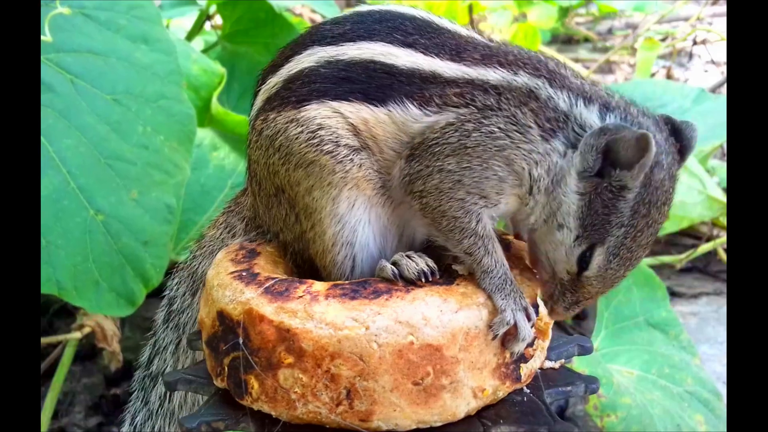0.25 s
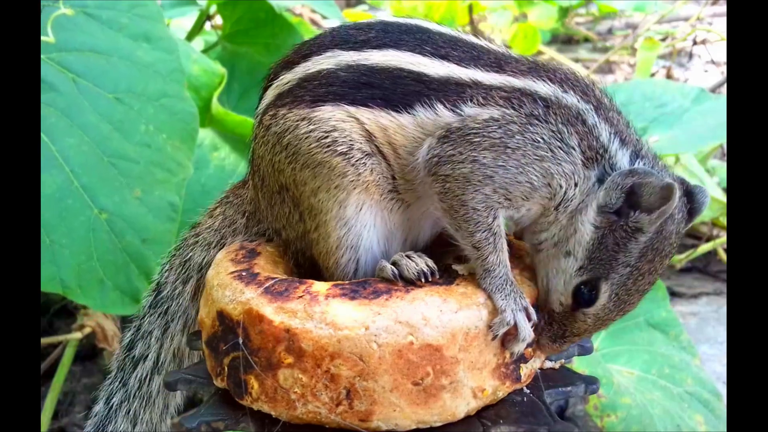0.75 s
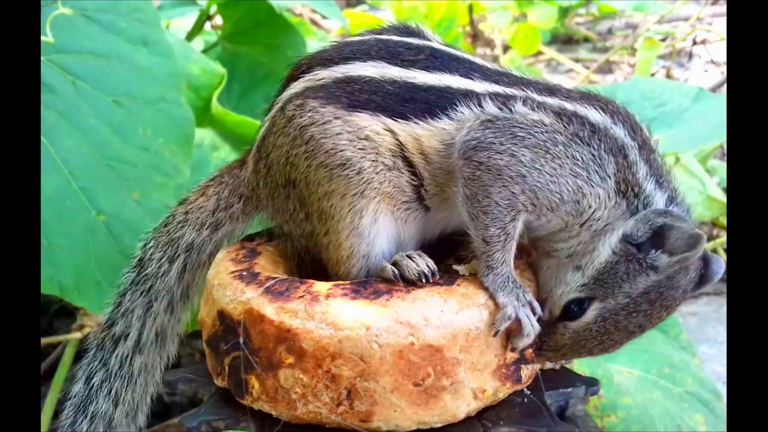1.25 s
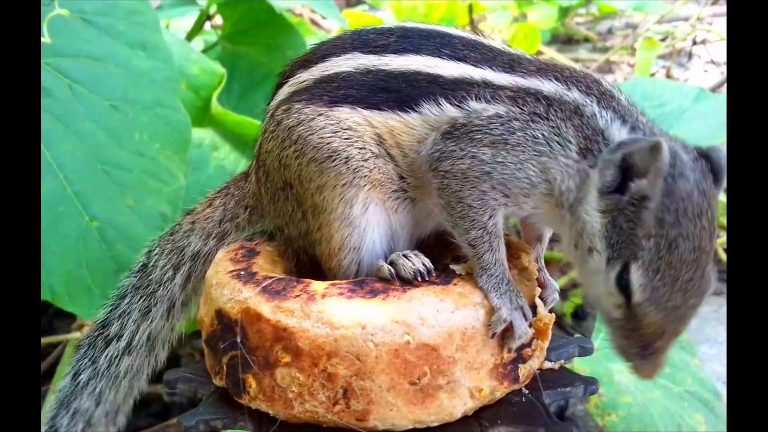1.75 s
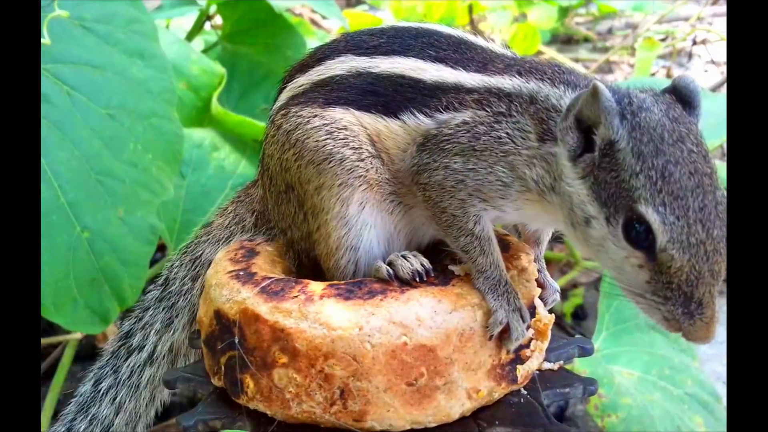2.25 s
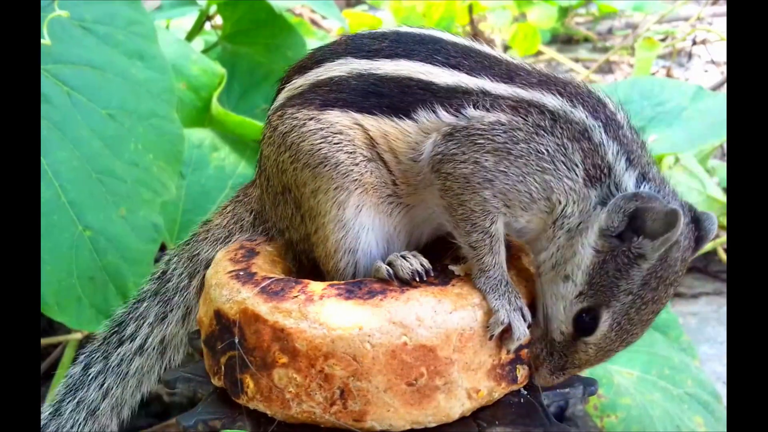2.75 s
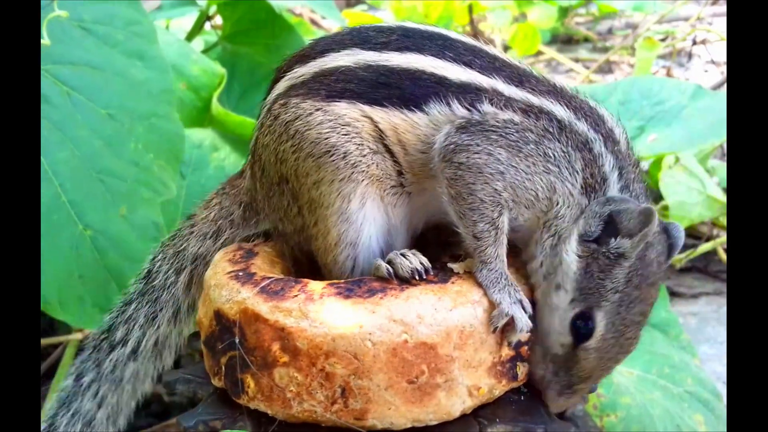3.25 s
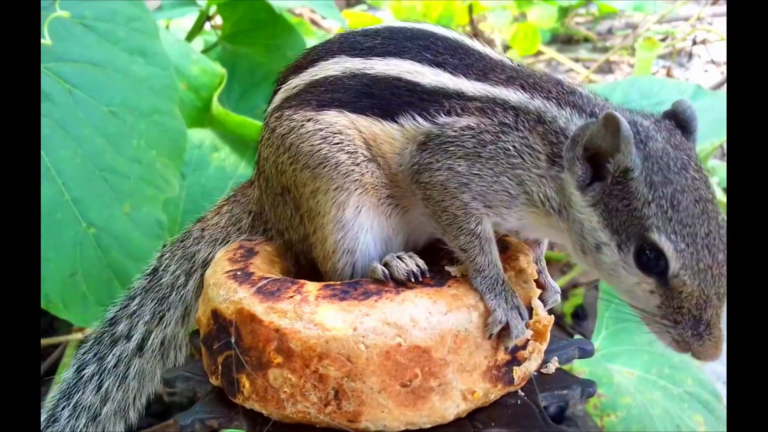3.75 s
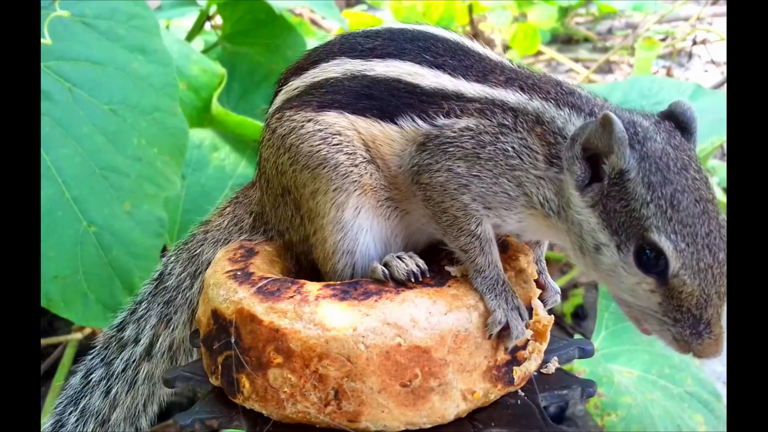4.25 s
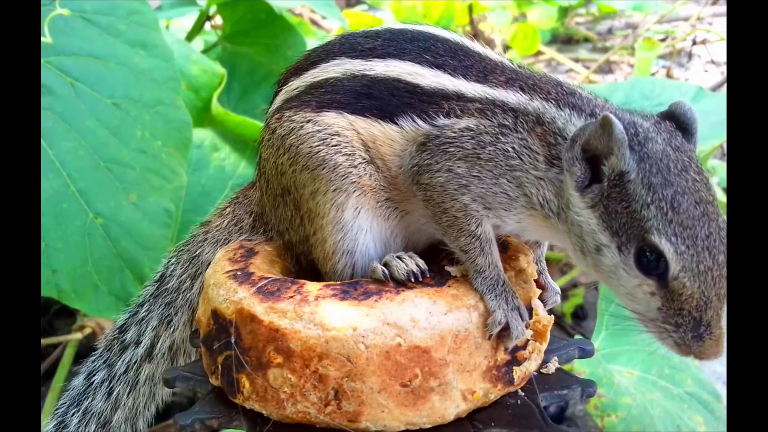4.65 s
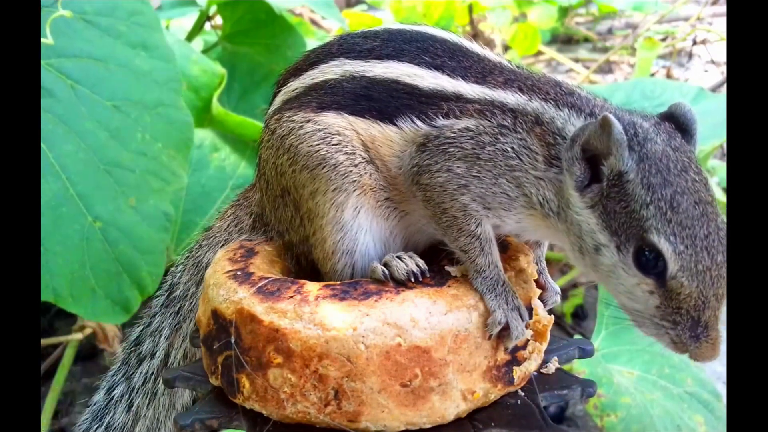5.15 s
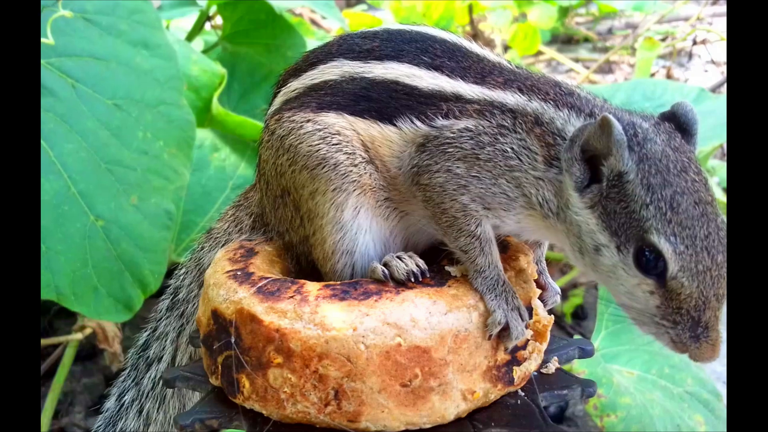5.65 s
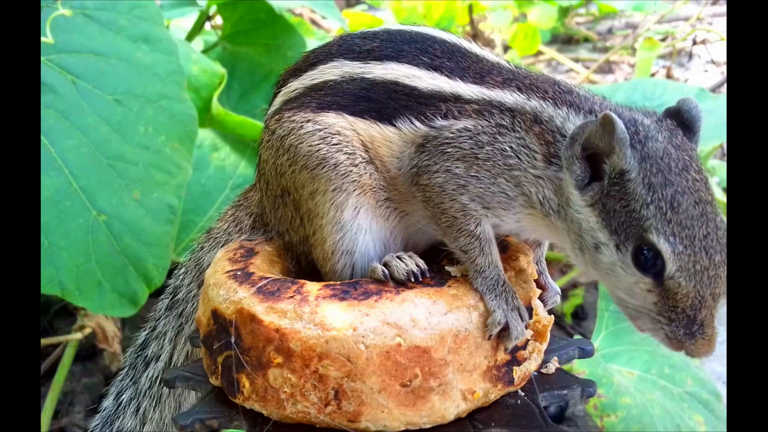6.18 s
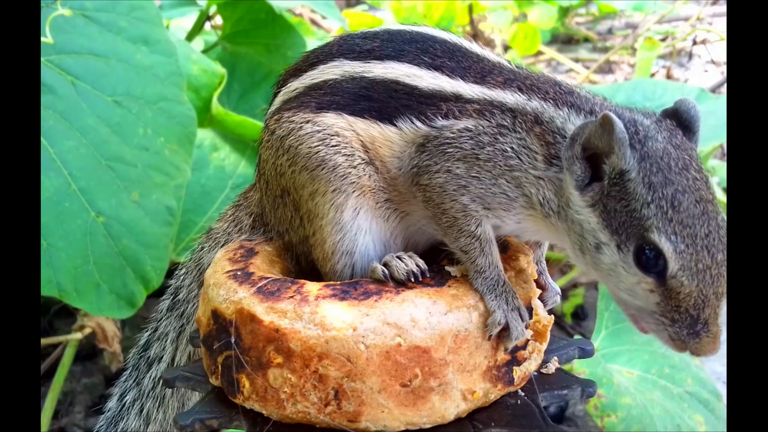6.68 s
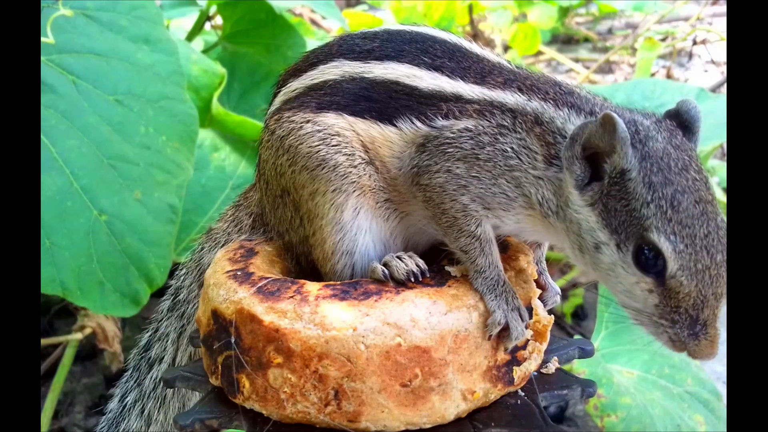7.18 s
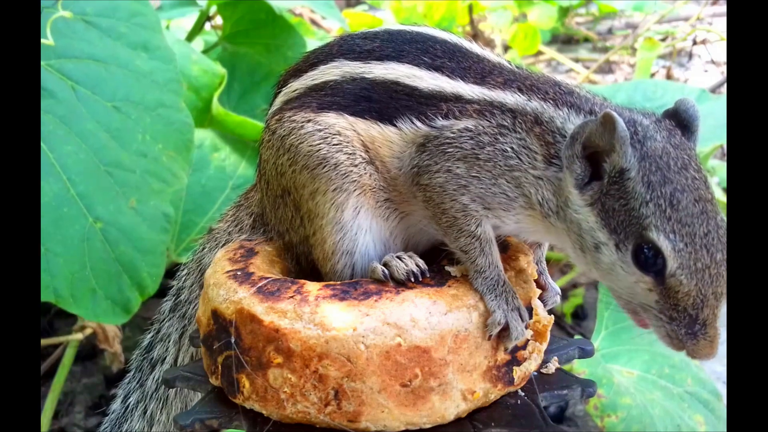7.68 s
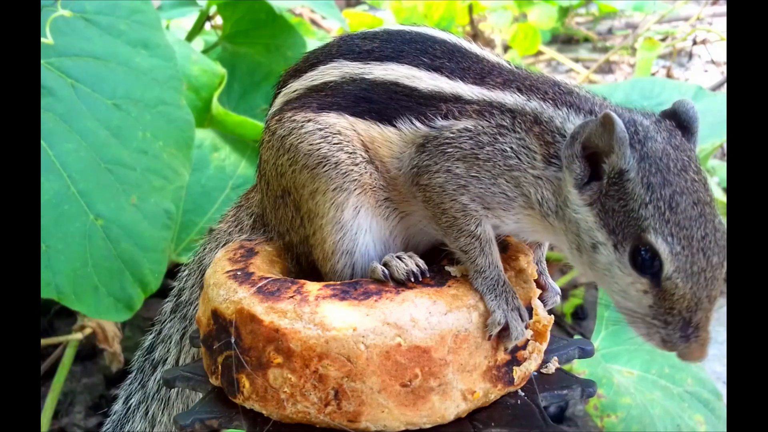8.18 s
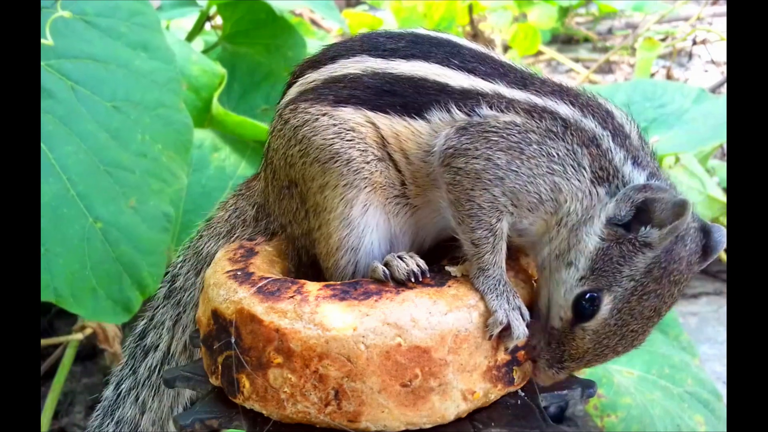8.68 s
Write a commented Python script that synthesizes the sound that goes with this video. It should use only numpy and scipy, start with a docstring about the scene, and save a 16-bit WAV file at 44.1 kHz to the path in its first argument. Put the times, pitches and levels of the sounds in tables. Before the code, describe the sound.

A small striped squirrel calls very close to the microphone in a quiet garden. A thin, high twitter drops within moments into a steady, rapid beat of short falling chips. Spaced piercing shrieks follow, breaking downward in pitch, then arched squeals that sink and turn hoarse. Wheezy, whistling squeaks join and alternate with soft nasal buzzes, pausing briefly before a last quick run. Faint outdoor wash lies beneath, with only a short echo.

```python
"""Squirrel alarm calls in a quiet garden

A small squirrel calls close by: short falling chips drop from a thin twitter to a steady beat.
The trill breaks into shrieks and arched squeals, which sink and grow hoarse.
Wheezy squeaks then alternate with soft nasal buzzes, over a faint wash of outdoor noise.
Each call sums harmonics of the vocal folds with noise puffed once a cycle, both shaped by a throat spectrum."""
import sys
import numpy as np
from scipy import signal
from scipy.fft import rfft, irfft, next_fast_len
from scipy.io import wavfile
from scipy.ndimage import uniform_filter1d

SR = 44100
rng = np.random.default_rng(int(sys.argv[2]) if len(sys.argv) > 2 else 0)


def generate_wav(sig):
    """Save sig (samples, or channels by samples) to the path in sys.argv[1] as 16-bit PCM at SR."""
    pcm = np.round(np.clip(np.atleast_2d(sig).T, -1, 1) * 32767).astype(np.int16)
    wavfile.write(sys.argv[1], SR, pcm)


N = 393460
EDGE_HZ = 11400  # upper band limit


def gain_of(db):
    """Logarithmic level: decibels become an amplitude factor."""
    return 10 ** (np.asarray(db) / 20)


def evened(x):
    """Normalization: scales to an rms of one."""
    return x / np.sqrt(np.mean(x ** 2) + 1e-20)


def read(points, hz):
    """Log-frequency interpolation of a two-column curve."""
    f, value = np.transpose(points)
    return np.interp(np.log(hz + 1), np.log(f + 1), value)


def along(curve, x):
    """Linear interpolation: reads every column of a curve at x."""
    at, *columns = np.transpose(curve)
    return [np.interp(x, at, column) for column in columns]


def coloured(x, points):
    """Linear filtering: multiplies the spectrum of x by a curve in dB."""
    size = next_fast_len(len(x) + 512)
    gain = gain_of(read(points, np.fft.rfftfreq(size, 1 / SR)))
    return irfft(rfft(x, size) * gain, size)[:len(x)]


def wander(size, rate_hz):
    """Random modulation of rms about one: chance values, two to a cycle of rate_hz, joined by lines."""
    knots = np.sqrt(1.5) * rng.standard_normal(512)
    return np.interp(2 * rate_hz * np.arange(size) / SR, np.arange(len(knots)), knots)


def span(start, end):
    """Normalized time: runs from 0 to 1 over the samples of a call."""
    return np.linspace(0, 1, max(round((end - start) * SR), 64))


def parts(u, values):
    """Piecewise interpolation: joins values at the centres of equal parts of a call."""
    return np.interp(u, (np.arange(len(values)) + .5) / len(values), values)


def fade(size, rise_s, fall_s):
    """Amplitude envelope: quarter-sine onset and release."""
    t = np.arange(size) / SR
    rise = np.sin(np.pi / 2 * np.minimum(t / rise_s, 1))
    fall = np.sin(np.pi / 2 * np.minimum(t[::-1] / fall_s, 1))
    return rise * fall


def played(call, rows):
    """Superposition: adds one call for each row at its start time."""
    out = np.zeros(N)
    for row in rows:
        sound = call(*row)
        part = out[round(row[0] * SR):]
        part[:len(sound)] += sound[:len(part)]
    return out


# spectrum of the outdoor noise: frequency_hz, relative_level_db
AIR_SPECTRUM = [(25, -3), (60, -4), (120, -5), (200, -1), (450, -7), (800, -8), (1600, -17), (2300, -27),
                (3200, -27), (4300, -21), (6000, -36), (11000, -46)]
# course of its level, before the swell: time_s, level_db
AIR_LEVEL = [(.37, -59), (1.8, -67), (2.5, -73.5), (3.3, -68), (4.3, -66.5), (5.3, -63), (6.4, -65.5),
             (7.3, -71), (8.9, -68)]
# left-right coherence: frequency_hz, likeness (0-1)
AIR_COHERENCE = [(40, .1), (400, 0.73), (9000, 0.96)]
AIR_START_S = .358


def air():
    """Filtered, partly coherent noise: a low, slowly swelling wash of distant outdoor sound."""
    t, hz = np.arange(N) / SR, np.fft.rfftfreq(N, 1 / SR)
    left, other = rfft(rng.standard_normal((2, N)))
    same = np.clip(read(AIR_COHERENCE, hz), -1, 1)
    pair = np.array([left, same * left + np.sqrt(1 - same ** 2) * other])
    wash = evened(irfft(pair * gain_of(read(AIR_SPECTRUM, hz)), N))
    # sines from 1 to 12 Hz, the slower ones stronger
    swell = evened(sum(np.sin(2 * np.pi * (f * t + rng.random())) / np.sqrt(f)
                       for f in np.geomspace(1, 12, 20)))
    level_db = np.interp(t, *np.transpose(AIR_LEVEL)) + 1.2 * swell
    return wash * gain_of(level_db) * (t > AIR_START_S)


# decay of the surroundings: frequency_hz, t60_s
ECHO_DECAY = [(200, 0.51), (900, 0.13), (2000, 0.14), (4300, 0.12), (8000, 0.047)]


def echo(x):
    """Diffuse reverberation: a short noise tail, partly alike in both ears, each band with its own decay."""
    hz, t, z = signal.stft(rng.standard_normal((2, SR // 2)), SR, nperseg=256)
    decay = gain_of(-60 * t / read(ECHO_DECAY, hz)[:, None])
    tails = signal.istft(z * decay, SR, nperseg=256)[1]
    mid, side = signal.fftconvolve(x[None], tails / np.linalg.norm(tails[0]), axes=1)[:, :N]
    return np.array([mid + 0.97 * side, mid - 0.15 * side])


# colour of close reflections: frequency_hz, gain_db
REFLECTION_COLOUR = [(900, -6), (3500, -8.5), (9000, 4.5)]


def scatter(x, t60):
    """Early reflection: objects close by return a short burst after 3 ms, different in each channel."""
    t = np.arange(SR // 8) / SR
    taps = rng.standard_normal((2, len(t))) * gain_of(-60 * t / t60) * (t > .003)
    taps = np.array([coloured(ear, REFLECTION_COLOUR) for ear in taps])
    return signal.oaconvolve(x[None], taps / np.linalg.norm(taps[0]), axes=1)[:, :N]


def voice(hz, throat, rough, first_order, uneven_db, rolloff_db):
    """Source and filter: fold harmonics and air puffs, one a cycle, pass the throat; also the bare fundamental."""
    phase = 2 * np.pi * np.cumsum(hz) / SR
    last_order = max(int(EDGE_HZ / hz.min()), first_order)
    k = np.arange(first_order, last_order + 1)[:, None]
    lag = rng.uniform(0, 2 * np.pi, k.shape)
    # each harmonic swells by itself, and high orders are weaker
    swell_db = uneven_db * np.array([wander(len(hz), rate_hz=41.5) for _ in k]) - rolloff_db * k
    strength = gain_of(read(throat, k * hz) + swell_db) * (k * hz < SR / 2)
    folds = (strength * np.cos(k * phase + lag)).sum(0)
    # the puffs are noise with the same roll-off
    tilted = [(f, db - rolloff_db * f / hz.mean()) for f, db in throat]
    puffs = coloured((1 + .7 * np.cos(phase)) * rng.standard_normal(len(hz)), tilted)
    rough = np.clip(rough, 0, 1)
    return np.sin(phase), evened((1 - rough) * evened(folds) + rough * evened(puffs))


def open_voice(hz, throat, rough, overtones_db):
    """Open-mouth radiation: a strong fundamental under overtones that grow with the strain."""
    fundamental, overtones = voice(hz, throat, rough, first_order=2, uneven_db=5.0, rolloff_db=2.45)
    share = gain_of(overtones_db)
    return (np.sqrt(2) * fundamental + share * overtones) / np.sqrt(1 + share ** 2)


# throat spectrum of a buzz: frequency_hz, gain_db
BUZZ_THROAT = [(300, -27), (600, -12.5), (1200, -17.5), (1700, -14.5), (2100, -26.5), (2900, -35.5),
               (3300, -6.5), (3700, 2.5), (4500, -9.5), (5600, -6.5), (7300, -29), (8600, -17.5),
               (9800, -20.5), (10800, -50.5)]
# higher buzzes are louder up to about 850 Hz; the highest are a little weaker: pitch_hz, level_db
BUZZ_LEVEL = [(450, -58), (500, -50), (600, -46.5), (850, -41.5), (1030, -44.5)]
# soft nasal buzzes: start_s, end_s, mean_pitch_hz
BUZZES = [(4.544, 4.598, 1049), (4.693, 4.718, 874), (4.722, 4.781, 803), (4.855, 4.922, 659),
          (4.914, 4.958, 918), (5.059, 5.11, 738), (5.399, 5.464, 747), (5.58, 5.634, 759),
          (5.763, 5.865, 952), (5.866, 5.913, 699), (6.003, 6.046, 711), (6.272, 6.32, 648),
          (6.323, 6.382, 884), (6.494, 6.535, 656), (6.61, 6.667, 518), (6.706, 6.755, 604),
          (6.861, 6.935, 495), (6.956, 7.005, 554), (7.132, 7.196, 513), (7.82, 7.885, 830),
          (8.006, 8.069, 434), (8.151, 8.2, 542), (8.282, 8.335, 491), (8.388, 8.433, 486),
          (8.486, 8.538, 591), (8.63, 8.681, 523), (8.734, 8.781, 480), (8.839, 8.887, 513)]


def buzz(start, end, pitch_hz):
    """Nasal radiation: a weak low note through the nose, whose pitch arches and sags."""
    u = span(start, end)
    bend = 0.12 * (np.sin(np.pi * u) - 2 / np.pi) - 0.106 * (u - .5)
    hz = pitch_hz * (1 + bend + 0.037 * wander(len(u), rate_hz=360))
    # partials at 0.96, 1.96, ... times the pitch are slightly inharmonic
    note = voice(hz, BUZZ_THROAT, rough=0.32, first_order=0.96, uneven_db=4.5, rolloff_db=1.0)[1]
    return gain_of(read(BUZZ_LEVEL, pitch_hz)) * note * fade(len(u), rise_s=0.012, fall_s=0.023)


# throat spectrum of a wheeze: frequency_hz, gain_db
WHEEZE_THROAT = [(200, -45), (700, -17), (1300, -19.5), (2000, -18.5), (2900, -30.5), (3400, 1.5),
                 (3900, -0.5), (4600, -2), (5300, -14.5), (6300, -13.5), (7300, -31), (8900, -22),
                 (10000, -29.5), (10800, -52)]
# course of every wheeze: share_of_length (0-1), whistle_pitch_factor, whistle_to_rasp_factor, level_db
WHEEZE_COURSE = [(0, .92, 0.52, -10.5), (.3, 1.0, 0.72, -1.5), (.6, .97, 0.44, 0), (.83, 1.1, 1.4, -5),
                 (1, .98, 0.57, -21)]
# the nose whistle leaps up once, then sinks slowly as the squirrel calms: time_s, whistle_hz
NOSE_WHISTLE = [(4.95, 4070), (5.02, 5430), (5.11, 4160), (5.8, 3891), (8.9, 3839)]
# colour of a puff of air: frequency_hz, gain_db
PUFF_COLOUR = [(50, -8), (140, 1.5), (1500, -27.5)]
# wheezy squeaks: start_s, end_s, base_level_db
WHEEZES = [(4.594, 4.704, -36.5), (4.945, 4.983, -36), (5.021, 5.062, -30.5), (5.106, 5.161, -32),
           (5.154, 5.214, -34), (5.208, 5.276, -32), (5.33, 5.371, -34), (5.432, 5.559, -32.5),
           (5.664, 5.76, -33), (5.916, 6.005, -32.5), (6.048, 6.123, -37), (6.192, 6.27, -31),
           (6.428, 6.495, -35), (6.537, 6.608, -35), (6.67, 6.707, -40), (6.757, 6.86, -30.5),
           (7.005, 7.13, -31), (7.886, 7.978, -30.5), (8.072, 8.153, -39), (8.202, 8.283, -33),
           (8.337, 8.386, -42), (8.438, 8.491, -39), (8.54, 8.63, -30.5), (8.684, 8.735, -40.5),
           (8.787, 8.842, -42), (8.888, 8.939, -35)]


def wheeze(start, end, db):
    """Resonant reinforcement: an unsteady hoarse voice whose third harmonic whistles in the nose."""
    u = span(start, end)
    glide, clear, swell_db = along(WHEEZE_COURSE, u)
    whistle_hz, = along(NOSE_WHISTLE, start)
    shake = .045 * wander(len(u), rate_hz=90) + .01 * wander(len(u), rate_hz=800)
    hz = whistle_hz * glide * (1 + shake)
    rasp = voice(hz / 3, WHEEZE_THROAT, rough=.43, first_order=1, uneven_db=3.5, rolloff_db=0)[1]
    whistle = np.sin(2 * np.pi * np.cumsum(hz) / SR)
    sound = evened(rasp + clear * whistle)
    level_db = db + swell_db + .9 * wander(len(u), rate_hz=230)
    strength = gain_of(level_db) * fade(len(u), rise_s=0.011, fall_s=0.011)
    # squared strength: the low puff of air matters most in the strongest squeaks
    puff = evened(coloured(rng.standard_normal(len(u)), PUFF_COLOUR))
    return strength * sound + gain_of(2.5) * strength ** 2 * puff


# throat spectrum of a chip: frequency_hz, gain_db
CHIP_THROAT = [(500, -23.5), (1400, -11), (2200, -9.5), (2550, -4), (3000, 3.5), (3400, 1.5), (4500, 3.5),
               (5000, -2), (5800, 3.5), (6700, -3), (7800, -17), (11000, -42.5)]
# course of every chip: share_of_length (0-1), top_pitch_factor, level_db, overtones_db
CHIP_COURSE = [(0, 0.84, -2.5, -10), (.17, 0.98, -2.5, 5.5), (0.449, 0.95, -0.5, 1.5), (.72, .74, 4, -3.5),
               (1, 0.52, -0.5, 2.5)]


def chip(start, length, top_hz, db, overtones_db):
    """Frequency glide: a brief harsh onset, then the pitch drops while the sound swells; only the end weakens."""
    u = span(start, start + length)
    glide, swell_db, strain_db = along(CHIP_COURSE, u)
    hz = top_hz * glide * (1 + 0.04 * wander(len(u), rate_hz=536))
    cry = open_voice(hz, CHIP_THROAT, rough=.36, overtones_db=overtones_db + strain_db)
    shake_db = 0.87 * wander(len(u), rate_hz=370)
    rise_s = np.interp(db, [-42, -33], [.007, .0012])  # weak chips start softly
    return gain_of(db + swell_db + shake_db) * cry * fade(len(u), rise_s, fall_s=0.0092)


# chips of the trill: start_s, length_s
CHIPS = [(.365, 0.022), (0.384, 0.014), (.397, 0.016), (0.412, .014), (0.425, 0.025), (0.452, 0.014),
         (0.465, .027), (.493, .02), (0.516, 0.023), (.547, 0.018), (0.585, .016), (0.631, 0.018),
         (0.684, .024), (0.735, .02), (0.783, 0.02), (.832, .02), (0.884, .022), (0.938, 0.021),
         (0.995, .021), (1.051, 0.023), (1.104, 0.022), (1.16, 0.019), (1.216, .023), (1.275, 0.022),
         (1.335, .022), (1.396, .022), (1.457, .022), (1.517, .021), (1.574, 0.021), (1.632, 0.013),
         (1.691, 0.013), (1.754, .012), (1.827, 0.024)]
# effort through the trill: time_s, top_pitch_hz, base_level_db, overtones_against_fundamental_db
TRILL_EFFORT = [(.365, 3580, -48.5, -22), (.41, 2850, -41.5, -16.5), (.515, 2012, -41, -7),
                (.547, 1674, -34, 1.5), (.63, 1221, -26, 8.5), (.684, 1105, -27, 8.5), (.85, 1109, -30, 0),
                (1.57, 1098, -29, -1), (1.69, 1067, -30, 5), (1.83, 1020, -30, -4)]
# little ticks as the mouth opens for a squeal: start_s
TICKS = [2.953, 3.279]
TICK_S, TICK_HZ, TICK_DB, TICK_OVERTONES_DB = 0.0049, 1370.5, -31.5, -17.5
# a strong chip that is cut short catches again, lower and weaker
CUT_SHORT_S, STRONG_DB = .014, -36
CATCH_AFTER_S, CATCH_PITCH_FACTOR, CATCH_DB, CATCH_OVERTONES_DB = 0.014, .82, -8, -5


def chips():
    """Effort coupling: one effort curve sets pitch and strength of every chip; ticks are tiny chips."""
    rows = [(start, TICK_S, TICK_HZ, TICK_DB, TICK_OVERTONES_DB) for start in TICKS]
    for start, length in CHIPS:
        hz, db, overtones_db = along(TRILL_EFFORT, start)
        rows.append((start, length, hz, db, overtones_db))
        if length < CUT_SHORT_S and db > STRONG_DB:
            rows.append((start + CATCH_AFTER_S, length, hz * CATCH_PITCH_FACTOR,
                         db + CATCH_DB, CATCH_OVERTONES_DB))
    return played(chip, rows)


# throat spectrum of squeals and shrieks: frequency_hz, gain_db
SQUEAL_THROAT = [(500, -16.5), (1500, -0.5), (2000, -5), (2450, -5.5), (2900, 2.5), (3500, 1), (4700, -2.5),
                 (5300, -2.5), (6400, -2), (7300, -11.5), (7900, -19.5), (11000, -50.5)]
# bright ring added by the wide-open mouth: frequency_hz, gain_db
MOUTH_RING = [(3000, -21), (4400, 7), (5700, -24.5)]


def strained(pitch_hz, db, overtones_db, rough, mouth, rise_s, fall_s):
    """Irregular fold vibration: a cry rasps at both ends; a rough one shakes more in pitch and level."""
    size = len(pitch_hz)
    u = np.linspace(0, 1, size)
    rough = rough + 0.39 * np.exp(-u / 0.08) + .25 * np.exp((u - 1) / 0.046)
    shake = 0.12 * rough * wander(size, rate_hz=640) + .014 * wander(size, rate_hz=80.1)
    hz = pitch_hz * (1 + shake)
    shake_db = (1.0 + 3 * rough) * wander(size, rate_hz=300)
    cry = open_voice(hz, SQUEAL_THROAT, rough + 0.0069, overtones_db)
    cry = cry + mouth * coloured(cry, MOUTH_RING)
    # the harmonics trade strength with each other, while the push of air sets the loudness
    cry = cry / np.sqrt(abs(uniform_filter1d(cry ** 2, size=256)) + 1e-9)
    return gain_of(db + shake_db) * cry * fade(size, rise_s, fall_s)


# course of each register: share_of_register (0-1), pitch_factor, level_db, overtones_db
WHISTLE_COURSE = [(0, .92, -3, -17.5), (0.499, 1.0, -0.5, -13), (1, 1.07, 1, -6)]
HIGH_COURSE = [(0, 1.02, -1, -6), (.35, 1.0, 1.5, -4.5), (0.999, .92, -2, 0)]
LOW_COURSE = [(0, 1.1, -3, -1), (.3, 1.0, 1, 0), (.75, .94, -3.5, -7), (1, .78, -2.5, -8)]
SHRIEK_WHISTLE_HZ = 3425
WHISTLE_ROUGH, HIGH_ROUGH, LOW_ROUGH = .09, 0.21, 0.066  # base roughness, 0-1
# shrieks: start_s, end_s, whistle_share (0-1), high_share (0-1), high_pitch_hz, low_pitch_hz,
# base_level_db, low_voice_base_level_db
SHRIEKS = [(1.991, 2.046, 0, 0.49, 2215, 1955, -32, -39),
           (2.177, 2.255, 0.27, 0.44, 2396, 1877, -31.5, -40.5),
           (2.39, 2.475, .25, 0.21, 2478, 1907, -28.5, -37),
           (2.59, 2.684, 0.06, 0.41, 2408, 1810, -27.5, -29),
           (2.798, 2.893, .13, .21, 2334, 1660, -28, -27.5),
           (3.481, 3.544, 0.02, 0.25, 2335, 1560, -35.5, -36.5)]


def shriek(start, end, whistle_share, high_share, high_hz, low_hz, db, low_db):
    """Register breaks: the pitch jumps down from whistle to high to low voice; some skip the whistle."""
    size = len(span(start, end))
    registers = [(whistle_share, WHISTLE_COURSE, SHRIEK_WHISTLE_HZ, db, WHISTLE_ROUGH),
                 (high_share, HIGH_COURSE, high_hz, db, HIGH_ROUGH),
                 (1 - whistle_share - high_share, LOW_COURSE, low_hz, low_db, LOW_ROUGH)]
    controls = []
    for share, course, register_hz, level_db, rough in registers:
        u = np.linspace(0, 1, max(round(share * size), 0))
        glide, swell_db, overtones_db = along(course, u)
        controls.append([register_hz * glide, level_db + swell_db, overtones_db, np.full(len(u), rough)])
    return strained(*np.hstack(controls), mouth=0, rise_s=0.0037, fall_s=.004)


# squeals grow hoarser as they sink, hoarsest near 800 Hz, somewhat clearer at the lowest:
# top_pitch_hz, base_roughness (0-1)
HOARSENESS = [(650, 0.31), (790, 0.5), (980, 0.22), (1250, 0.16), (1600, 0.14)]
# steepness of the arch; loss of level and overtones as the mouth shuts at the ends;
# overtones lost from start to end
ARCH_POWER, SHUT_DB, SHUT_OVERTONES_DB, RELAX_DB = 2.2, -6, -3.5, 11
# the throat closes at a steady rate: closed share and edge as parts of a beat, level when closed,
# share of pitch lost over a beat
STUTTER_HZ, STUTTER_CLOSED, STUTTER_EDGE, STUTTER_DB, STUTTER_SAG = 34.9, .28, 0.24, -38.5, .13
MOUTH_WIDEST, MOUTH_SPREAD = 0.14, .22  # shares of the call
# squeals: start_s, end_s, top_pitch_hz, place_of_top (0-1), pitch_share_lost_by_end,
# early_level_db, late_level_db, overtones_db, stutters (true or false)
SQUEALS = [(1.886, 1.925, 1182, 0.05, 0.45, -38, -33.5, -3, False),
           (2.963, 3.027, 1605, 0.51, .2, -31, -34.5, -4, False),
           (3.115, 3.186, 1610, 0.14, .33, -32.5, -29.5, 4.5, True),
           (3.294, 3.369, 1655, 0.34, 0.23, -28, -32.5, 6, True),
           (3.458, 3.476, 2056, 0.7, 0.047, -43, -37.5, 1.5, False),
           (3.625, 3.702, 1453, 0.35, 0.37, -35.5, -34.5, 1, False),
           (3.801, 3.879, 1403, 0.39, 0.49, -30.5, -38.5, 8, False),
           (3.98, 4.064, 1547, 0.38, .39, -28, -35.5, 4, False),
           (4.202, 4.264, 805, 0.2, 0.099, -55, -37, -11.5, False),
           (4.257, 4.335, 985, .35, 0.27, -39, -35.5, -10, False),
           (4.391, 4.465, 1226, .35, 0.24, -35.5, -35.5, -8, False),
           (4.586, 4.693, 1113, 0.2, 0.36, -39, -35, 8, False),
           (4.759, 4.852, 1282, 0.33, 0.47, -28, -32.5, 4, False),
           (4.941, 5.037, 1604, 0.42, 0.47, -33.5, -33.5, 0, False),
           (5.158, 5.232, 1206, .27, .39, -36, -36.5, -1, False),
           (5.279, 5.375, 1333, 0.4, .45, -24, -31.5, 4.5, False),
           (5.473, 5.541, 1173, 0.11, .42, -35.5, -37, 1.5, False),
           (5.61, 5.698, 1221, 0.17, 0.4, -30.5, -35.5, 3, False),
           (5.779, 5.862, 1255, .4, .39, -35.5, -38, -0.5, False),
           (5.93, 6.017, 952, 0.28, 0.21, -40, -39.5, -4, False),
           (6.126, 6.224, 1252, 0.4, 0.31, -24, -28.5, 4.5, False),
           (6.338, 6.415, 648.7, 0.01, 0.069, -32.5, -38, 8.5, False)]


def squeal(start, end, top_hz, crest, sag, early_db, late_db, overtones_db, stutters):
    """Tension arch: the pitch bends over a crest and the tone dulls as strain eases; some stutter in beats."""
    u = span(start, end)
    hz = top_hz * (1 - sag * (abs(u - crest) / (1 - crest)) ** ARCH_POWER)
    shut = (2 * u - 1) ** 4
    db = parts(u, [early_db, late_db]) + SHUT_DB * shut
    if stutters:
        beat = (u * (end - start) * STUTTER_HZ) % 1
        opening = np.clip(np.minimum(beat, 1 - STUTTER_CLOSED - beat) / STUTTER_EDGE, 0, 1)
        db = db + STUTTER_DB * (1 - opening) ** 2
        hz = hz * (1 - STUTTER_SAG * (beat - (1 - STUTTER_CLOSED) / 2))
    strain_db = overtones_db - RELAX_DB * (u - .5) + SHUT_OVERTONES_DB * shut
    mouth = np.exp(-((u - MOUTH_WIDEST) / MOUTH_SPREAD) ** 2)
    rise_s = np.interp(early_db, [-37, -29], [.014, .003])  # weak squeals start softly
    return strained(hz, db, strain_db, read(HOARSENESS, top_hz), mouth, rise_s, fall_s=0.0021)


def scene():
    """Direct and reflected sound: loud open calls raise an echo; nasal ones are only widened by reflections."""
    trill = chips()
    cries = played(shriek, SHRIEKS) + played(squeal, SQUEALS)
    nasal = played(wheeze, WHEEZES) + played(buzz, BUZZES)
    side = gain_of(-3.5) * scatter(nasal, t60=.025)[0]
    widened_nasal = np.array([nasal + side, nasal - side])
    near = gain_of(-16.5) * scatter(trill + cries, t60=0.12)
    far = echo(gain_of(-15.5) * trill + gain_of(-20.5) * cries)
    return trill + cries + widened_nasal + near + far + air()


def record(dry):
    """Band limitation: a linear-phase low-pass at the upper edge."""
    low_pass = signal.firwin(255, EDGE_HZ, window=("kaiser", 7), fs=SR)
    return signal.oaconvolve(dry, low_pass[None], "same")


dry = scene()
out = record(dry)
generate_wav(out)
```